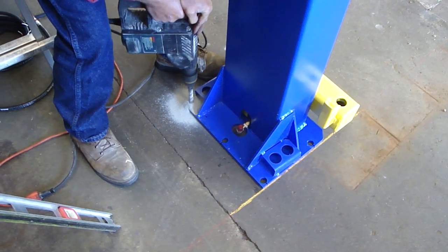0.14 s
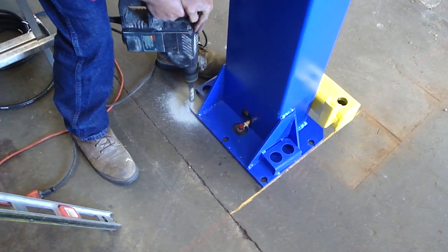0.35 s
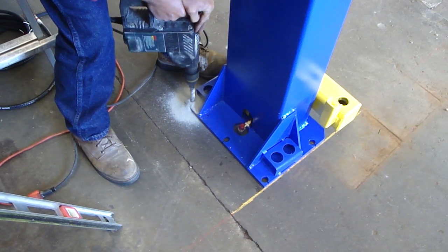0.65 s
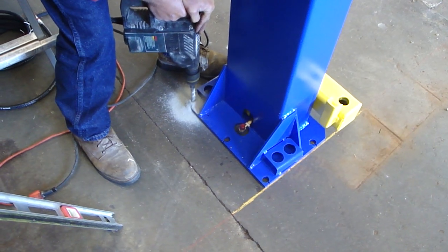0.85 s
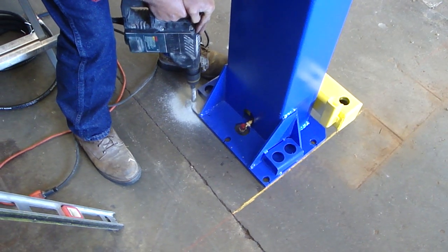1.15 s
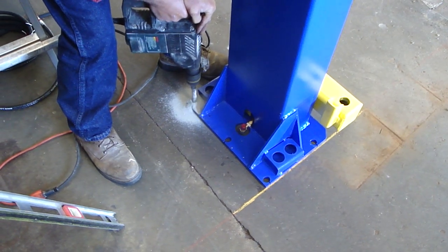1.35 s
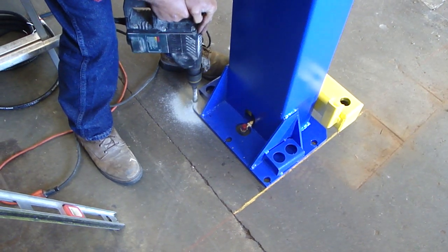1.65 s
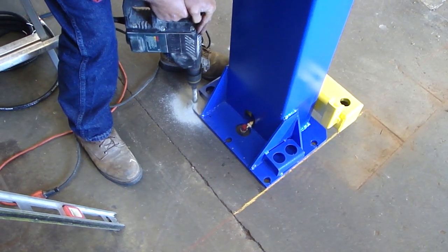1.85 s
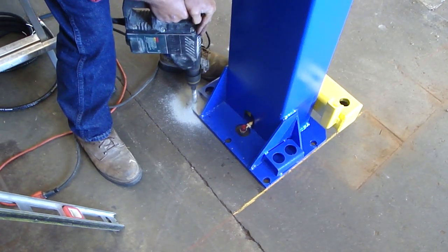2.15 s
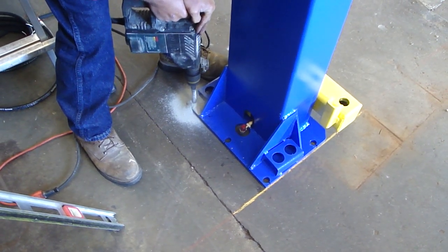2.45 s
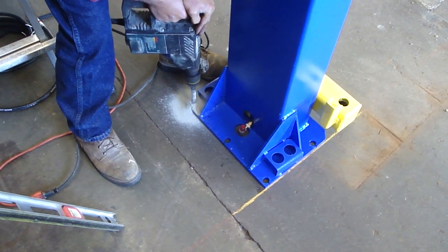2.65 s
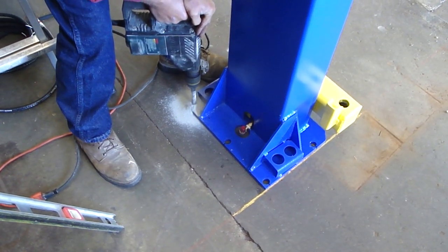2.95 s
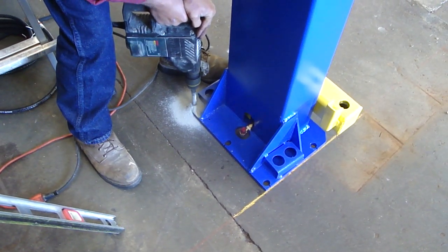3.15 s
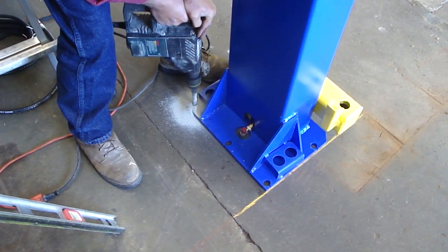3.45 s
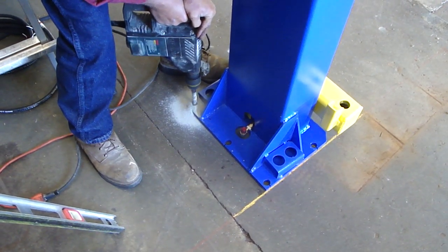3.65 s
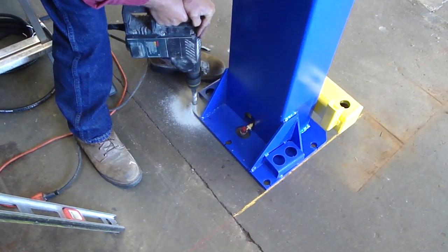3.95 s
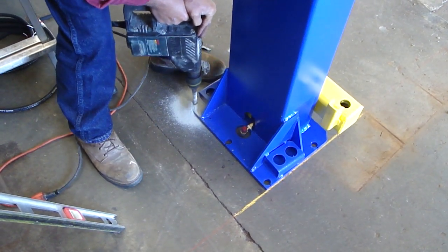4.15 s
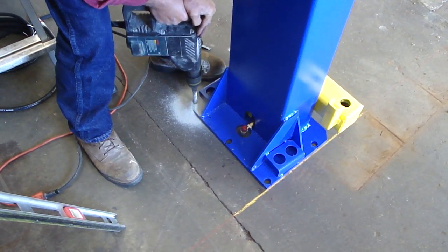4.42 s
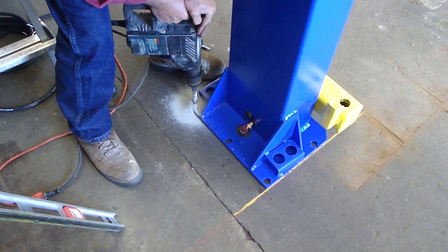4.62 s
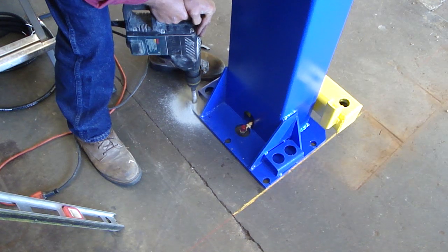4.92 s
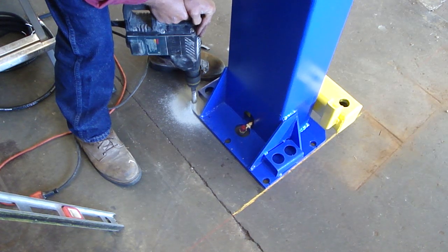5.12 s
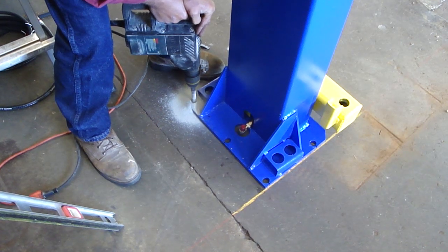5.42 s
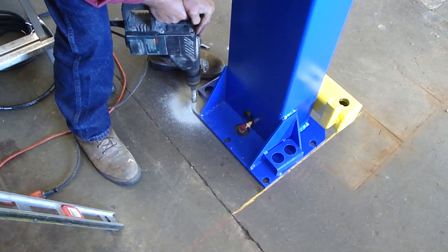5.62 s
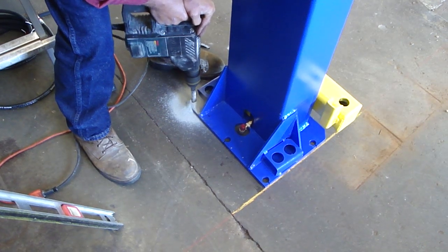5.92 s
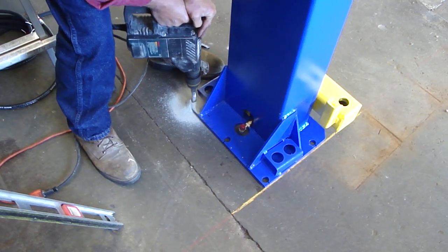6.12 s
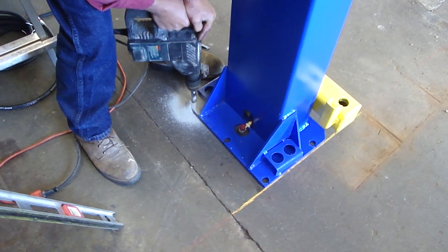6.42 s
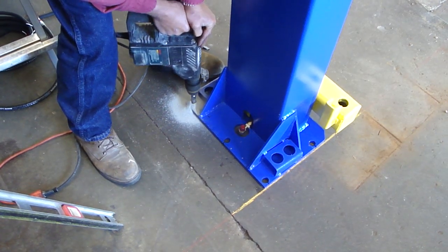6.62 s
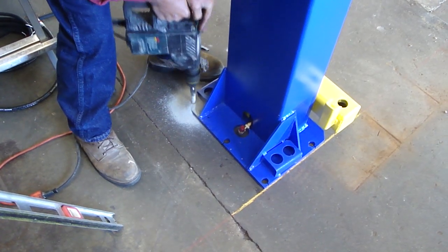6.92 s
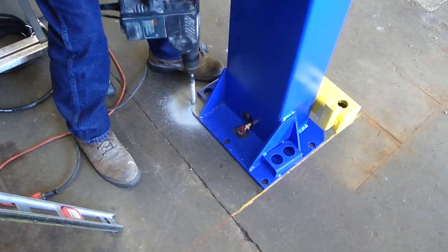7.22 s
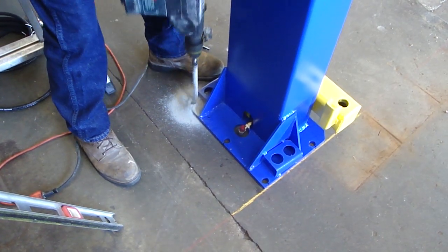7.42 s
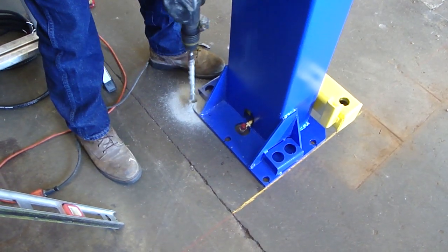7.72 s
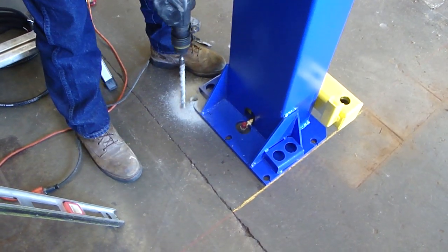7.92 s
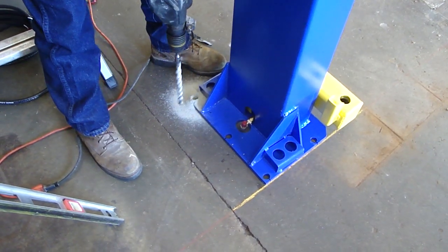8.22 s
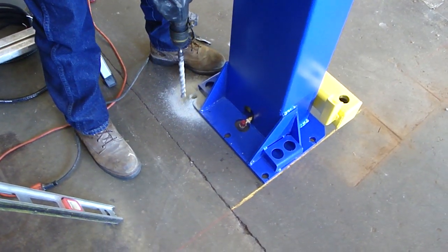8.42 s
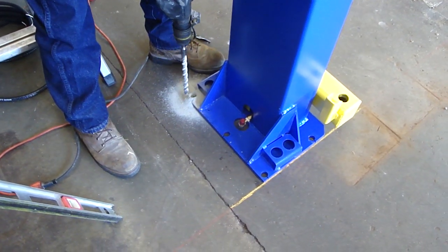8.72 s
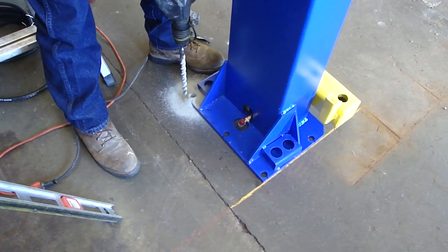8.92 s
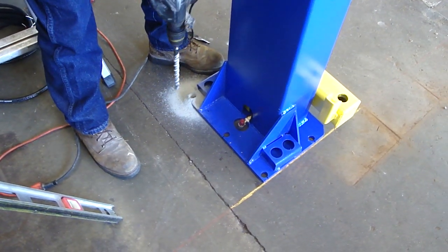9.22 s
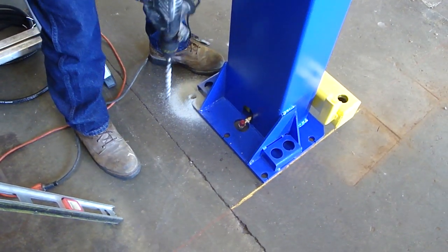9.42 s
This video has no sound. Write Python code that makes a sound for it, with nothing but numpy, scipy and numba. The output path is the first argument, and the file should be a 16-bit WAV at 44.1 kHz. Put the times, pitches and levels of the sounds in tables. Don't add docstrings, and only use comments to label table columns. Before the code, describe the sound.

A power drill hammers steadily into a floor, a gritty, buzzing roar with thumping low tone and occasional chip cracks, gradually getting louder. Around six seconds it loosens with bright metallic chatter, revs freely as it is lifted, then winds down: the pitch drops, strokes separate into ticking knocks and stop. Hard, echoing shop; nearby phone microphone whose opening gain raises the room rumble at the end.

```python
import sys
import numpy as np
from scipy import signal
from scipy.fft import rfft, irfft
from scipy.io import wavfile
from scipy.ndimage import uniform_filter1d
from numba import njit

SR = 44100
rng = np.random.default_rng(int(sys.argv[2]) if len(sys.argv) > 2 else 0)


def volts_from_decibels(level):
    exponent = np.asarray(level, float) / 20
    return 10 ** exponent


def transcribe(u):
    v = np.clip(np.atleast_2d(u).T, -1, 1)
    q = np.round(v * 32767).astype(np.int16)
    wavfile.write(sys.argv[1], SR, q)


N = 421590

# t/s, level/dB, lean toward the bass/dB
TOOL_LEVEL = [(0, -50.5, 0.5), (1.86, -47.5, 0.5), (2.08, -49.5, -1.5), (2.39, -45, 0), (2.95, -42.5, 0),
              (5.64, -35.5, 0.5), (5.88, -36.5, 0), (6.47, -34.5, 0.5), (6.57, -35.5, 1.5),
              (6.79, -32.5, -0.5), (7.03, -32, -1), (7.45, -27, -1.5), (7.77, -29.5, 1), (7.9, -31, 0),
              (8.44, -34, 0.5), (8.94, -33, 4), (9.29, -41, 6.5), (9.5, -48.5, 13.5)]


def curve(table):
    s, *columns = np.transpose(table)
    return [np.interp(np.arange(N) / SR, s, c) for c in columns]


def unit(x):
    return x / np.sqrt(np.mean(x ** 2))


def colour(x, points):
    hz, db = np.transpose(points)
    f = np.arange(N // 2 + 1) * SR / N + 1
    return irfft(rfft(x) * volts_from_decibels(np.interp(np.log(f), np.log(hz), db)), N)


def band(x, lo_hz, hi_hz):
    return signal.sosfilt(signal.butter(3, [lo_hz, hi_hz], "band", fs=SR, output="sos"), x)


def passband(x, lo_hz, hi_hz):
    f = np.arange(N // 2 + 1) * SR / N
    return irfft(rfft(x) * ((f >= lo_hz) & (f < hi_hz)), N)


@njit
def svf(x, hz, width):
    y, b, l = np.empty(len(x)), 0., 0.
    for i in range(len(x)):
        g, k = np.tan(np.pi * hz[i] / SR), width / hz[i]
        v = (b + g * (x[i] - l)) / (1 + g * (g + k))
        b, l, y[i] = 2 * v - b, l + 2 * g * v, k * v
    return y


def walk(rate):
    k = int(SR / rate)
    held = np.repeat(rng.standard_normal(N // k + 1), k)
    return unit(uniform_filter1d(uniform_filter1d(held, k), k)[:N])


def hump(s, length):
    return np.cos(np.pi * np.clip((np.arange(N) / SR - s) / length, -.5, .5)) ** 2


def struck(hits, modes, push_s, vary_db):
    out, t = np.zeros(N + 4096), np.arange(4096) / SR
    hz, t60, mode_db = np.transpose(modes)[:, :, None]
    for s, db in hits:
        size, detune, phase = rng.standard_normal((3, len(modes), 1))
        size[0] = 0
        decay = volts_from_decibels(db + mode_db + vary_db * size) * 1000. ** (-t / t60)
        rings = decay * np.sin(2 * np.pi * (hz * (1 + .007 * detune) * t + phase))
        out[int(s * SR):int(s * SR) + 4096] += rings.sum(axis=0) * (1 - np.exp(-t / push_s))
    return out[:N]


def shop():
    # t/s, level/dB
    shop_level = [(0, -89), (2.21, -82), (3.72, -81), (5.7, -77), (7.5, -68), (7.75, -64), (8.33, -61),
                  (8.42, -56), (9.0, -52), (9.56, -53.5)]
    # f/Hz, level/dB per Hz
    shop_tone = [(12, -74), (20, -60), (114, -12), (200, -5), (320, -1), (428, -2.5), (514, -0.5),
                 (1370, -9), (1780, -20), (2140, -15), (3180, -10), (11000, -55), (14300, -83),
                 (22000, -120)]
    # t/s, lift/dB, length/s
    bumps = [(6.11, 4, .1), (6.968, 6, .15), (7.633, 5, 0.11), (7.828, 6, .2), (8.552, 2, 0.05),
             (9.1, 4, 0.12), (9.19, 5, 0.37), (9.36, 2, 0.18)]
    flutter_db = .9 * walk(9)
    rumble = unit(colour(rng.standard_normal(N), shop_tone))
    drone = unit(band(rng.standard_normal(N), 18, 66))
    level_db = curve(shop_level)[0] + sum(db * hump(s, length) for s, db, length in bumps)
    return volts_from_decibels(level_db + 6.0 + flutter_db) * rumble + volts_from_decibels(0.53 * level_db - 58) * drone


def room(x):
    level_db, low_t60_s, treble_t60_s = -9, 0.98, 0.6
    t, angle = np.arange(SR) / SR, 4.55 * walk(6)
    out = 0
    for share in (np.cos(angle), np.sin(angle)):
        low = band(rng.standard_normal(SR), 154, 4100) * 1000. ** (-t / low_t60_s)
        high = band(rng.standard_normal(SR), 4900, 11300) * 1000. ** (-t / treble_t60_s)
        tail = (low + high) * (t > .006)
        out = out + signal.fftconvolve(x * share, tail / np.sqrt(np.sum(tail ** 2)))[:N]
    return volts_from_decibels(level_db) * out


def glides():
    # t/s, length/s, start f/Hz, end f/Hz, peak level/dB
    slides = [(6.22, .6, 930, 1110, -51), (7.05, .45, 990, 900, -56), (6.9, .9, 670, 570, -59),
              (6.85, .4, 1320, 1370, -53), (7.31, .14, 880, 890, -46), (7.3, .2, 1120, 1140, -52),
              (7.15, .7, 4080, 3800, -45), (6.3, 1.2, 3830, 4170, -47), (6.89, .2, 6750, 6450, -43),
              (7.4, .3, 1380, 1350, -46), (6.2, .2, 1300, 1310, -52), (7.9, .12, 190, 175, -62),
              (9.155, .13, 560, 470, -45), (9.275, .1, 3180, 3100, -38), (9.278, .07, 1790, 1810, -37),
              (7.65, .07, 1720, 1700, -37)]
    out = np.zeros(N)
    for s, length, from_hz, to_hz, db in slides:
        on = slice(int((s - length / 2) * SR), int((s + length / 2) * SR))
        centre = np.linspace(from_hz, to_hz, on.stop - on.start)
        width_hz = .02 * to_hz
        grit = rng.standard_normal(len(centre))
        tone = svf(svf(grit, centre, width_hz), centre, 2 * width_hz)
        out[on] += volts_from_decibels(db) * hump(s, length)[on] * unit(tone)
    return out


def swells(gate):
    # t/s, centre f/Hz, width/Hz, peak level/dB, length/s
    singing = [(6.11, 274, 18, -67, 0.44), (6.42, 256, 26, -68, 0.49), (6.898, 990, 99, -50, 0.6),
               (7.1, 3980, 350, -40, 1.9), (7.452, 4440, 756, -33, 0.41), (7.505, 7500, 890, -33.5, 0.64),
               (7.73, 6100, 300, -44, 0.35), (7.902, 4550, 540, -33, 0.43), (8.05, 4200, 400, -38, .4),
               (8.04, 3890, 160, -40, 1.2), (7.97, 7270, 1300, -35, 0.97), (8.8, 3350, 150, -44, .2),
               (8.21, 3110, 98, -37.5, 0.16), (8.416, 7340, 500, -37.5, 0.57), (8.65, 6320, 550, -39, 0.78),
               (8.545, 334, 27, -47.5, 0.11), (9.118, 330, 35, -45, 0.067), (9.21, 504, 33, -44, 0.05),
               (9.05, 300, 40, -48, 0.058), (8.94, 720, 35, -53, .07), (8.98, 730, 46, -48, 0.04),
               (10, 710, 54, -45, .16), (9.04, 1006, 51, -46, 0.13), (8.94, 1120, 60, -46, .06),
               (9.193, 2840, 150, -44, 0.064), (9.0, 7200, 378, -54, 0.87), (9.27, 3100, 210, -46, 0.1),
               (9.28, 1850, 170, -41, 0.11), (7.298, 2200, 410, -46, 0.53), (9.27, 2460, 530, -47, 0.18),
               (9.55, 315, 44.8, -46.5, 0.088)]
    out = np.zeros(N)
    for s, hz, width_hz, db, length in singing:
        on = slice(int((s - length / 2) * SR), min(N, int((s + length / 2) * SR)))
        centre = (hz * (1 + 0.0088 * walk(5)))[on]
        grit = (rng.standard_normal(N) * gate)[on]
        envelope = (volts_from_decibels(db + 1.7 * walk(15)) * hump(s, length))[on]
        out[on] += envelope * unit(svf(svf(grit, centre, 1. * width_hz), centre, 2. * width_hz))
    return out


def ticks():
    # t/s, peak level/dB
    chip_hits = [(0.0363, -30), (0.4354, -28), (0.6794, -35), (0.7921, -35), (1.799, -18), (1.9106, -38),
                 (1.9669, -21), (2.037, -26), (2.1919, -38), (2.3471, -36), (2.5027, -35), (2.8135, -36),
                 (3.153, -22), (3.4371, -34), (4.2253, -15)]
    # t/s, peak level/dB
    slack_hits = [(8.3518, -29), (8.3853, -34), (8.4172, -33), (8.5464, -9), (8.6297, -30), (8.724, -11),
                  (8.7524, -31), (8.7769, -17), (8.837, -16), (8.878, -22), (8.9011, -22), (8.9764, -20),
                  (9.003, -22), (9.049, -14), (9.0672, -10.5), (9.1094, -16), (9.122, -26), (9.1584, -17),
                  (9.1715, -13), (9.184, -20), (9.236, -24), (9.324, -15), (9.329, -16), (9.364, -21),
                  (9.382, -28),
                  (7.37, -19), (7.4094, -17), (7.518, -14), (7.635, -15), (7.694, -18), (7.7408, -16),
                 (7.7574, -13), (7.8084, -23), (7.826, -15), (7.8434, -18), (7.8624, -14), (7.9184, -14),
                 (7.936, -26), (7.9578, -18), (7.9784, -18), (8.0004, -18), (8.0202, -13), (8.0431, -18),
                 (8.0641, -19), (8.087, -21), (8.11, -16), (8.1594, -20), (8.1844, -23), (8.21, -17),
                 (8.2367, -18), (8.2944, -23), (8.3244, -23), (8.387, -19), (8.4185, -18), (8.455, -20),
                 (8.5066, -12), (8.5694, -16), (8.6984, -18), (8.8094, -29), (8.9296, -20), (9.0194, -31)]
    out, t = np.zeros(N + 1024), np.arange(1024) / SR
    for s, db in chip_hits + slack_hits:
        crack = volts_from_decibels(db - 12.0) * rng.standard_normal(1024) * np.exp(-t / 0.0034)
        out[int(s * SR):int(s * SR) + 1024] += crack
    return band(out[:N], 3400, 8360)


def knocks():
    # t/s, peak level/dB
    knock_hits = [(7.7558, -25), (7.7724, -28), (7.7889, -22), (7.8106, -28), (7.826, -29), (7.8434, -23),
                  (7.863, -20), (7.879, -22), (7.8975, -23), (7.9174, -32), (7.9389, -26), (7.9591, -18.5),
                  (7.98, -18), (7.9998, -29), (8.0227, -18), (8.0436, -34), (8.0647, -24), (8.0897, -24),
                  (8.113, -26), (8.1354, -23), (8.16, -28), (8.1844, -33), (8.2091, -23), (8.236, -28),
                  (8.2647, -25), (8.295, -24.5), (8.3194, -33), (8.3554, -25), (8.3864, -35), (8.4214, -34),
                  (8.4705, -26), (8.4891, -22.5), (8.5086, -29), (8.528, -25), (8.5476, -34), (8.5666, -26),
                  (8.6088, -33), (8.6312, -33), (8.6524, -31), (8.677, -26), (8.6993, -25), (8.7257, -24.5),
                  (8.748, -29), (8.7839, -30), (8.8103, -33), (8.8396, -25), (8.8774, -22), (8.9035, -28),
                  (8.9311, -34), (8.9422, -26), (8.9756, -30), (9.0225, -22), (9.0495, -27), (9.0695, -25),
                  (9.1233, -25.5), (9.183, -28), (9.2371, -32), (9.2602, -34), (9.2735, -27), (9.3876, -33)]
    # f/Hz, t60/s, level/dB
    casing = [(1744, 0.036, -5), (1832, 0.029, -3), (1047, 0.034, -19), (2300, .02, -19), (3040, 0.019, -6),
              (3760, .025, -7.5), (3930, 0.016, -16), (4620, 0.023, -6.5), (6470, .02, -13),
              (7160, 0.018, -14)]
    return volts_from_decibels(0.5) * struck(knock_hits, casing, push_s=0.00084, vary_db=2.0)


def whine(hz):
    # f/Hz, reach above/Hz, reach below/Hz, level/dB
    outlets = [(4600, 150, 150, 15), (3130, 150, 420, 23), (2600, 120, 90, 16), (2010, 120, 120, 13),
               (1790, 70, 70, 15)]
    hz = 87 * hz
    level_db = curve(TOOL_LEVEL)[0] - 23
    for f, above, below, db in outlets:
        reach = np.where(hz > f, above, below)
        level_db = level_db + db * np.exp(-((hz - f) / reach) ** 2)
    flutter_db, wobble = 1.5 * walk(30), .2 * walk(50)
    return volts_from_decibels(level_db + flutter_db) * np.sin(2 * np.pi * np.cumsum(hz) / SR + wobble)


def bit():
    # t/s, level/dB
    ring_level = [
        (5.78, -36),
        (6.12, -32),
    ]
    # t/s, peak level/dB
    later_blows = [(6.1335, -28.5), (6.1484, -29), (6.1769, -26), (6.1904, -25), (6.2044, -32), (6.2195, -24),
                   (6.2336, -25), (6.2464, -31), (6.2615, -23), (6.2754, -29), (6.2901, -28), (6.3061, -25),
                   (6.3204, -28), (6.3344, -27), (6.35, -22), (6.3634, -33), (6.38, -21), (6.3954, -35),
                   (6.4128, -32), (6.43, -26.5), (6.4562, -24), (6.471, -23), (6.4842, -22), (6.4996, -22),
                   (6.514, -21), (6.5291, -26), (6.544, -21), (6.558, -23), (6.573, -23.5)]
    # f/Hz, t60/s, level/dB
    shank = [(7980, 0.011, 3.5), (8350, 0.008, -4), (9200, .005, -12), (9860, 0.0066, -9.5),
             (6020, 0.01, -7.5), (3970, 0.012, -14)]
    first_s, blow_hz, blows, scatter_db = 5.7813, 68.25, 24, 4
    times = first_s + np.arange(blows) / blow_hz
    peak_db = np.interp(times, *np.transpose(ring_level)) + scatter_db * rng.standard_normal(blows)
    return volts_from_decibels(2.5) * struck([*zip(times, peak_db), *later_blows], shank, push_s=0.00087, vary_db=7)


def slab(turns):
    # multiple, level/dB
    thump = [(1, -40), (2, -26), (3, -17), (4, -21), (5, -10.5), (6, -5.5), (7, -9.5), (8, -10.5), (9, -3),
             (10, -4.5), (11, -8), (12, -6), (13, -3.5), (14, 0.5), (15, -8), (16, -10), (17, -16),
             (18, -14)]
    # t/s, thump against the tool/dB
    grip = [(0, -17.5), (2.9, -18), (3.5, -16.5), (5.7, -15), (5.9, -25.5), (6.2, -20), (6.6, -32),
            (6.9, -69), (9.56, -60)]
    # t/s, tilt/dB per multiple above the sixth
    bite = [
        (0, -.3),
        (3, -.25),
        (4.2, 0),
        (5.3, .3),
    ]
    tilt_db = curve(bite)[0]
    lines = 0
    for k, db in thump:
        level_db = db + max(k - 6, 0) * tilt_db + .9 * walk(3)
        phase = .15 * walk(8) + .06 * k * k
        lines = lines + volts_from_decibels(level_db) * np.cos(2 * np.pi * k * turns + phase)
    return volts_from_decibels(curve(grip)[0] + curve(TOOL_LEVEL)[0]) * unit(lines)


def strokes(turns):
    # first stroke t/s, strokes per s, loss per s, strokes
    coast = [
        (7.74, 60, 46, 31),
        (8.4517, 56, 60, 25),
    ]
    last_s = [9.176, 9.25, 9.324, 9.363, 9.4125]
    # t/s, level/dB
    accents = [(7.823, 4.5), (7.845, 5), (7.863, -2), (7.9, -2), (7.92, -5), (7.96, -2), (7.98, -2),
               (8.02, -5.5), (8.088, 2), (8.21, -0.5), (8.608, 3.5), (8.78, -1), (8.84, -3), (8.875, 0.5),
               (8.9, 0), (8.935, -2.5), (8.975, -0.5), (9.02, -0.5), (9.0675, 1), (9.121, 3), (9.18, 1),
               (9.25, 5), (9.324, -3), (9.363, 3.5), (9.4125, -1)]
    runs = []
    for s0, rate, loss, n in coast:
        runs.append(s0 + (rate - np.sqrt(rate ** 2 - 2 * loss * np.arange(n))) / loss)
    s = np.concatenate(runs + [last_s])
    first, t = int(s[0] * SR), np.arange(N) / SR
    count = 2 * turns
    start = 2 * np.ceil(count[first] / 2) + 1
    count = count + start - count[first]
    count[first:] = start + np.interp(t[first:], np.append(s, N / SR), np.arange(len(s) + 1))
    size_db = 1.5 * rng.standard_normal(N // 200)
    for when, db in accents:
        size_db[int(start) + np.argmin(abs(s - when))] = db
    slow = np.where(t > coast[1][0], 2 - 0.15, 2 * (t > s[0]))
    return count, size_db, slow


def burst(count, size_db, back_db, length, slow):
    k = count.astype(int)
    x = (count - k) / length
    onset = np.where(slow % 2 > 0, 0.22, 0.34)
    return unit(volts_from_decibels(size_db[k] + back_db * (k % 2) * (2 - slow)) * (x + onset) * np.exp(-2 * x))


def body(x, points, modes, modes_db, sway):
    rings = 0
    for (hz, width, db), shift in zip(modes, sway):
        rings = rings + volts_from_decibels(db) * svf(x, hz * shift, 1. * width)
    return unit(colour(x, points)) + volts_from_decibels(modes_db) * unit(rings)


def rattle(turns, load, depth, count, size_db, slow):
    # low f/Hz, high f/Hz, return stroke/dB, burst length/strokes,
    # rotor throb/0-1, chips/dB, extra throb under load
    parts = [
        (250, 1330, -8, 0.52, 0.6, 1, 0),
        (1373, 2142, -18, 0.6, 0.1, 2, 0.25),
        (2424, 5350, -1, 0.4, 0.2, 1.5, 0.22),
        (5500, 7450, -16, 0.6, 0, 2.5, 0.1),
        (7450, 11000, -14, 0.4, 0, 1.6, 0.25),
    ]
    # level under load/dB, extra level running free/dB, share of the lean
    shares = [
        (-10, -1, 0.72),
        (-13, 8, 0.33),
        (-0.5, 0.74, -0.23),
        (-4.5, -0.5, -0.95),
        (-1.5, -6.5, -0.85),
    ]
    # f/Hz, level/dB per Hz
    loaded_tone = [(180, -52), (300, -32), (420, -25), (540, -22), (600, -16), (760, -13.5), (880, -8),
                   (990, -8.5), (1180, -10), (1670, -5), (2600, -8.5), (3150, -10.5), (3350, -1), (5200, 1),
                   (6000, -0.5), (8200, 4), (11000, -6)]
    # f/Hz, level/dB per Hz
    free_tone = [(120, -43), (250, -29), (460, -19.5), (700, -9.5), (1200, -27), (1770, -4.5), (2300, -6.5),
                 (3000, 1), (3900, -0.5), (4700, 0.5), (5500, 3.5), (6400, 1.5), (7500, 4), (11000, -12)]
    # f/Hz, width/Hz, level/dB
    loaded_modes = [(632, 45, 1), (995, 70, 1), (1695, 21, -7), (2343, 120, 1), (3930, 320, -8),
                    (4000, 160, -17), (4930, 350, -3), (6960, 56, 14), (8090, 80, 12), (10150, 720, 3)]
    # f/Hz, width/Hz, level/dB
    free_modes = [(700, 51, -15), (1066, 68, -6), (1317, 136, 1), (1727, 47, -3.5), (2500, 89, -3),
                  (3100, 130, -11), (3880, 180, 3.5), (4270, 230, 0.5), (6240, 52, 6), (6380, 260, 11),
                  (6810, 62, -61), (7300, 67, -16), (7500, 73, 2)]
    out, (tool_db, lean_db) = 0, curve(TOOL_LEVEL)
    sway = [1 + .006 * walk(4.7) for _ in free_modes]
    rotor_wave = np.sin(2 * np.pi * 5 * turns)
    for (db, free_db, share), part in zip(shares, parts):
        lo, hi, back_db, length, rotor, chips_db, extra = part
        grit = rng.standard_normal(N) * volts_from_decibels(chips_db * walk(900) + 0.35 * walk(25))
        throb = np.clip(depth + extra * load ** 2, 0, 1)
        gate = (1 - throb) + throb * burst(count, size_db, back_db, length, slow)
        drive = grit * gate * (1 + rotor * rotor_wave)
        loaded = body(drive, loaded_tone, loaded_modes, modes_db=-11.5, sway=np.sqrt(sway))
        free = body(drive, free_tone, free_modes, modes_db=-8.5, sway=sway)
        mix = load * unit(band(loaded, lo, hi)) + (1 - load) * unit(band(free, lo, hi))
        out = out + volts_from_decibels(tool_db + db + free_db * (1 - load) + share * lean_db - 2.5) * mix
    return out


def scene():
    # t/s, turns per s, load on the bit/0-1, depth of the stroke throb/0-1
    crank = [(0, 70.6, 0.75, 0.27), (2, 70.7, 0.74, 0.25), (5.6, 70.75, 0.77, 0.18),
             (6.0, 67.5, 0.44, 0.33), (6.2, 69.5, 0.51, 0.1), (6.5, 68, 0.78, 0.38), (6.7, 75, 0.31, 0.18),
             (7.0, 73.5, 0.36, 0.07), (7.5, 76, 0.32, 0.35), (7.75, 61.5, 0.23, 0.12),
             (8.0, 49.3, 0.23, 0.6), (8.25, 37.4, 0.18, 0.5), (8.45, 29.5, 0.1, 0.5), (8.7, 21, 0.17, 0.65),
             (9.0, 11, 0.15, 0.8), (9.2, 6.1, 0.02, 0.38), (9.27, 4.4, 0, 0.6), (9.56, 1, 1, 0.24)]
    hz, load, depth = curve(crank)
    load, depth = np.clip(load, 0, 1), np.clip(depth, 0, 1)
    turns = np.cumsum(hz) / SR
    count, size_db, slow = strokes(turns)
    gate = 1 - depth + depth * burst(count, size_db, -18.0, 0.97, slow)
    tool = rattle(turns, load, depth, count, size_db, slow)
    tool = tool + bit() + whine(hz) + ticks() + swells(gate) + knocks()
    heard = tool + room(tool) + glides()
    cancel = np.interp(np.arange(N) / SR, [8.5, 9.0, 9.27, 9.32], [0.04, 0.42, 0.92, 0.18])
    heard = heard - cancel * svf(heard, np.full(N, 5450.), 970.0)
    return (heard + slab(turns) + shop())[None]


def roll_off(x):
    return signal.sosfilt(signal.butter(12, 15600, fs=SR, output="sos"), x)


def record(dry):
    # low f/Hz, high f/Hz
    air_bands = [(12620, 12860), (12860, 13700), (13700, 14450), (14450, 15120)]
    # level/dB, open above this treble level/dB
    air_levels = [(-25, -42), (-16, -67.5), (-14, -61.5), (-15, -48)]
    air_doubt = [30, 3.5, 1.3, .8]
    # f/Hz, level/dB
    air_tilt = [(12500, -8), (12900, -6), (13300, 2), (14000, 1), (14450, -12), (15150, 6)]
    cut_hz, shift_hz, frame = 11040, 4300, 1024
    treble = passband(dry[0], 12500 - shift_hz, cut_hz)
    power = uniform_filter1d(passband(treble, 9600, cut_hz) ** 2, size=frame)[::frame]
    frame_db = 10 * np.log10(power + 1e-12)
    carrier = np.cos(2 * np.pi * shift_hz * np.arange(N) / SR)
    lifted = colour(2 * treble * carrier, air_tilt)
    lifted = lifted * volts_from_decibels(1.7 * (walk(35) + walk(80)) - 0.5)
    out = passband(dry[0], 0, cut_hz)
    for (lo, hi), (db, open_db), doubt_db in zip(air_bands, air_levels, air_doubt):
        is_open = frame_db + doubt_db * rng.standard_normal(len(frame_db)) > open_db
        on = uniform_filter1d(np.repeat(1. * is_open, frame)[:N], size=frame // 2)
        out = out + volts_from_decibels(db) * on * passband(lifted, lo, hi)
    return roll_off(out[None])


dry = scene()
out = record(dry)
transcribe(out)
```